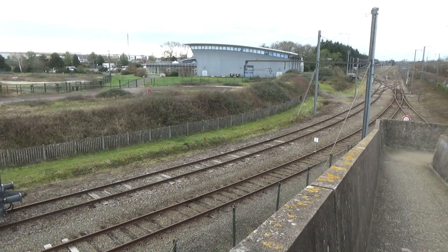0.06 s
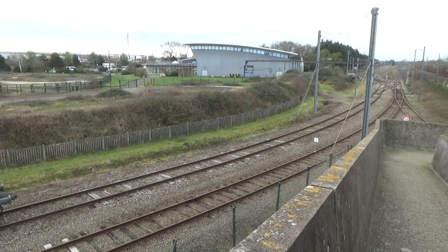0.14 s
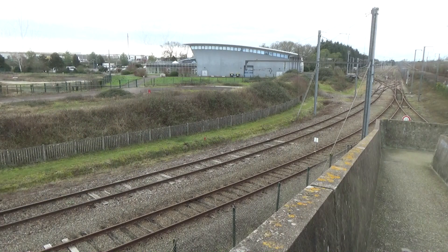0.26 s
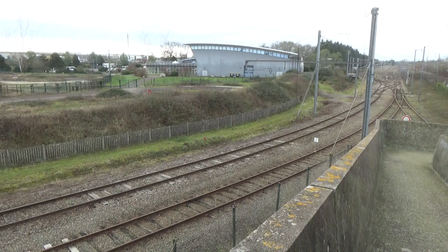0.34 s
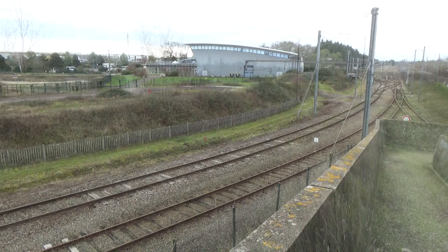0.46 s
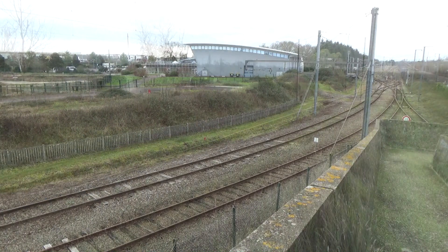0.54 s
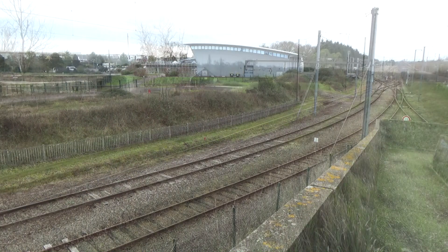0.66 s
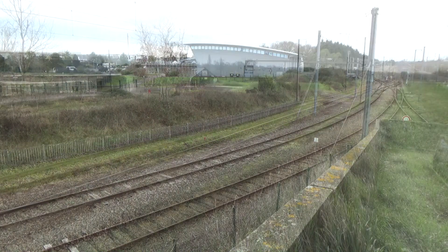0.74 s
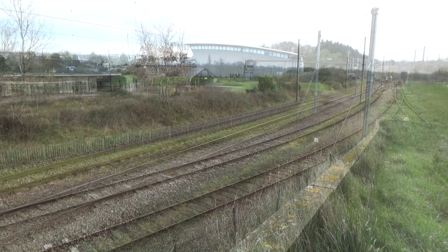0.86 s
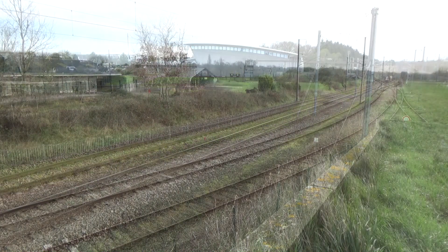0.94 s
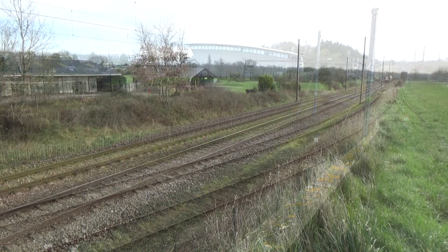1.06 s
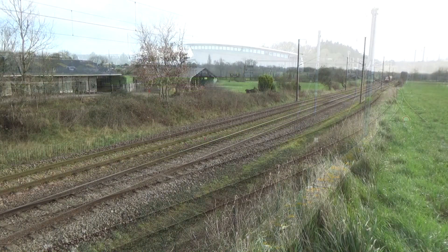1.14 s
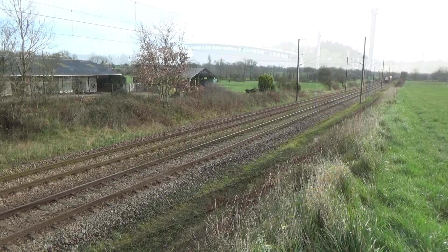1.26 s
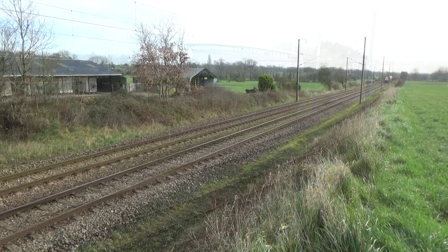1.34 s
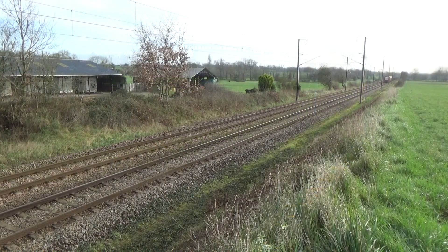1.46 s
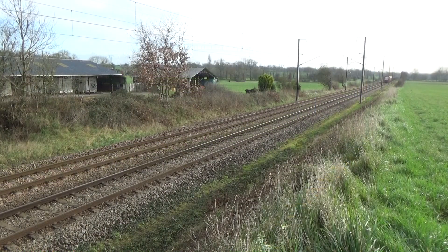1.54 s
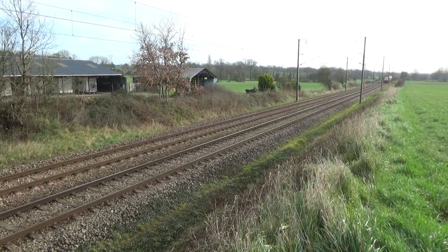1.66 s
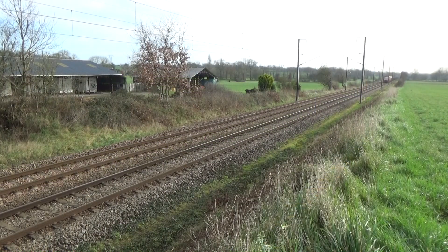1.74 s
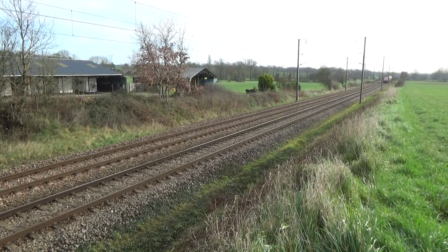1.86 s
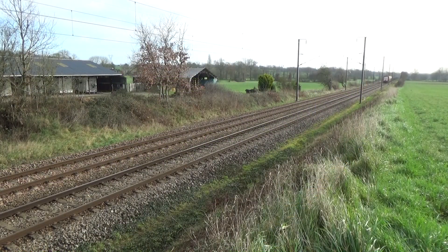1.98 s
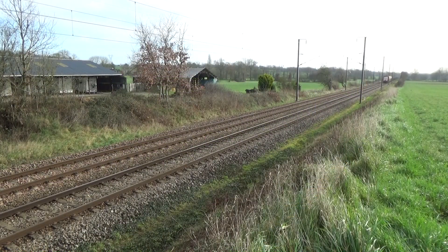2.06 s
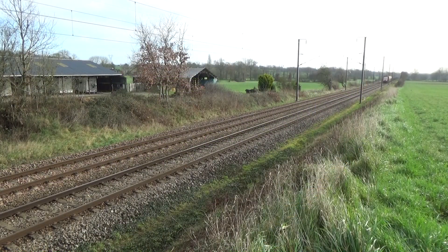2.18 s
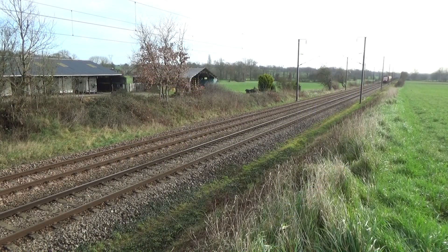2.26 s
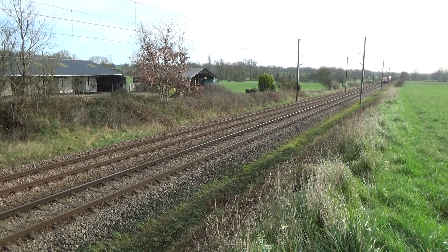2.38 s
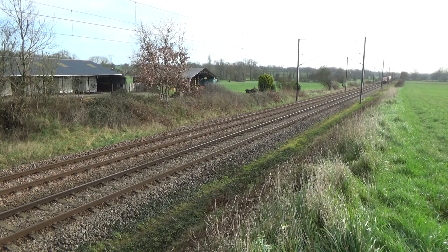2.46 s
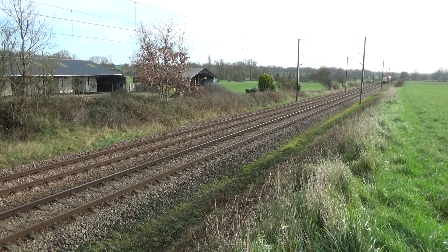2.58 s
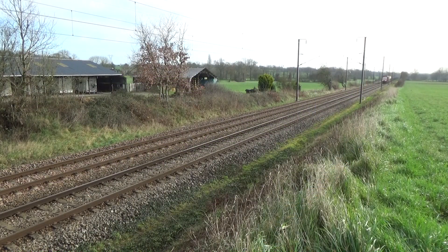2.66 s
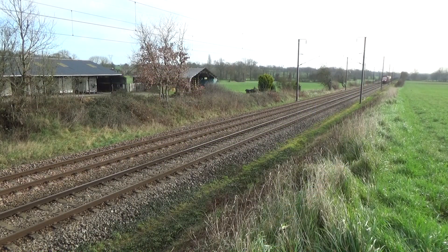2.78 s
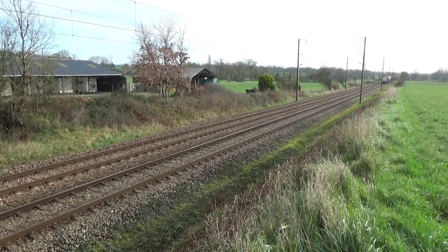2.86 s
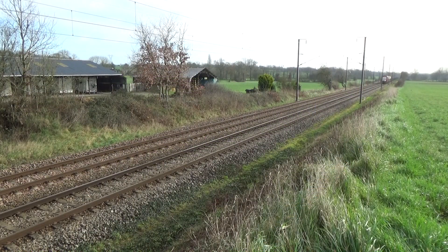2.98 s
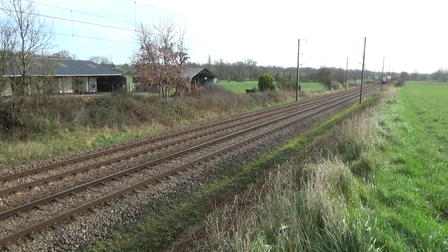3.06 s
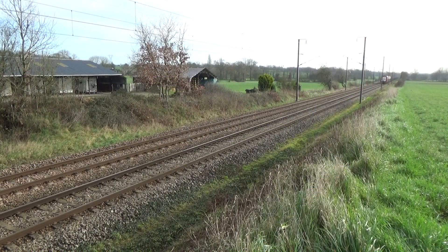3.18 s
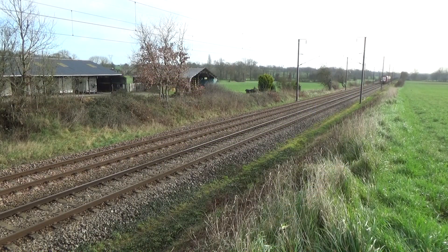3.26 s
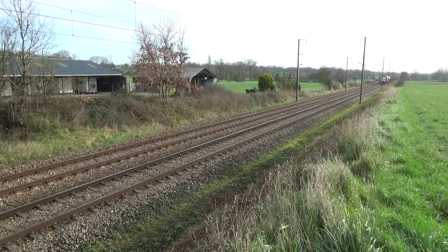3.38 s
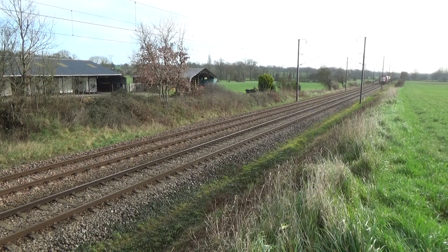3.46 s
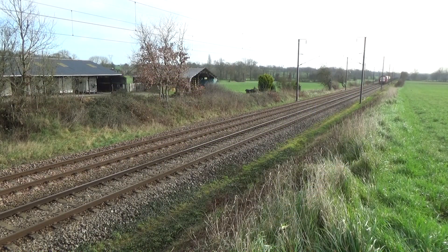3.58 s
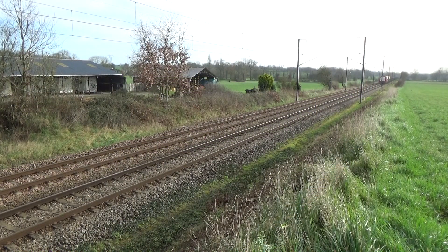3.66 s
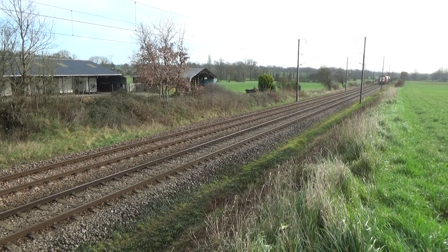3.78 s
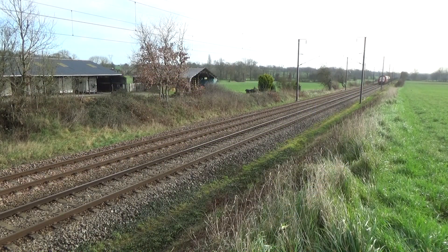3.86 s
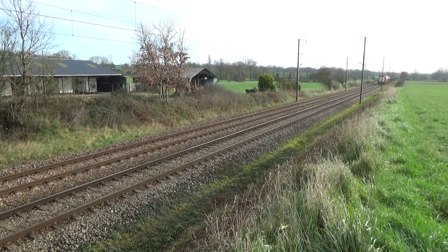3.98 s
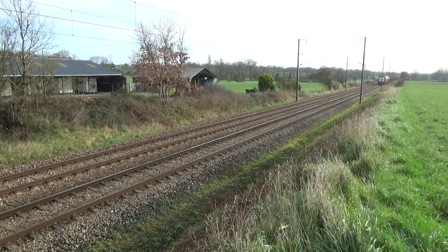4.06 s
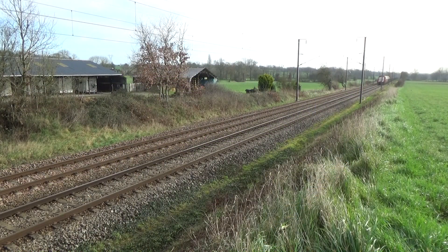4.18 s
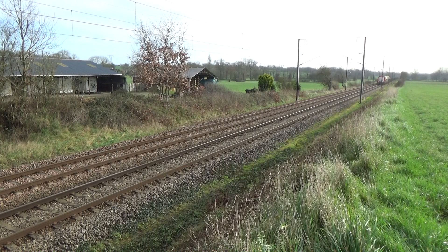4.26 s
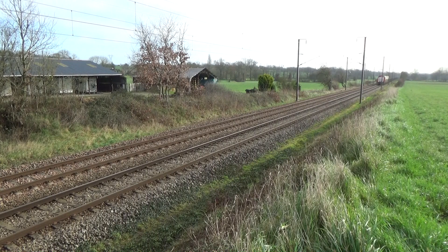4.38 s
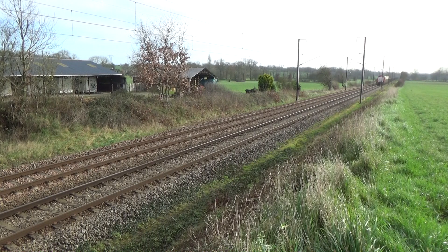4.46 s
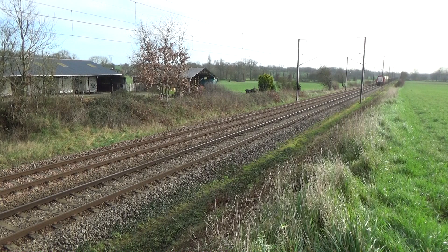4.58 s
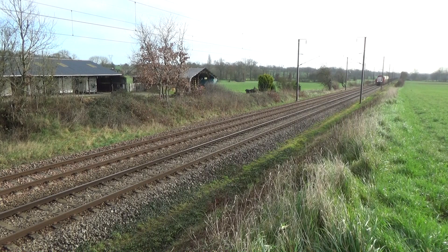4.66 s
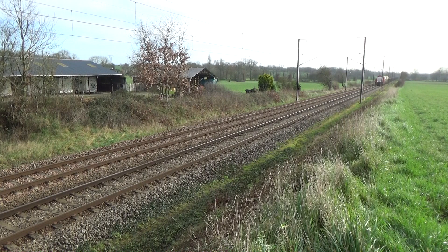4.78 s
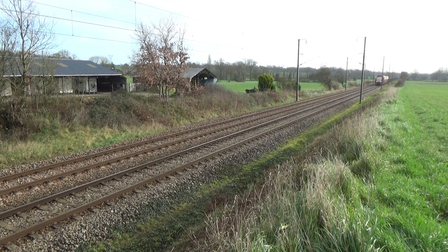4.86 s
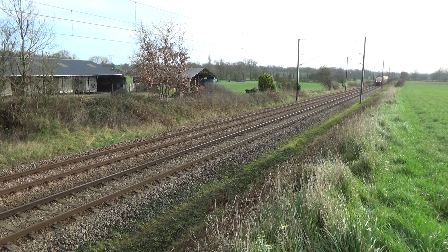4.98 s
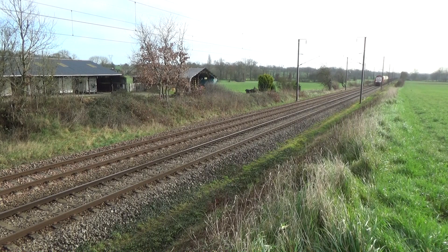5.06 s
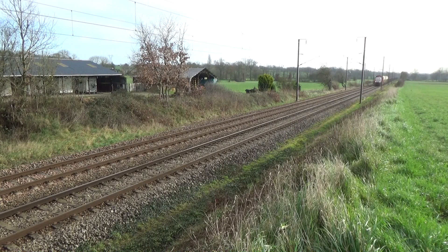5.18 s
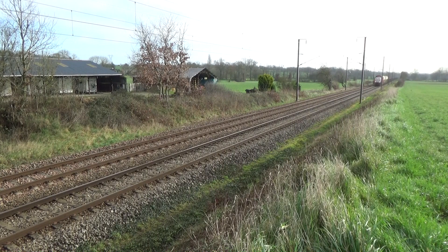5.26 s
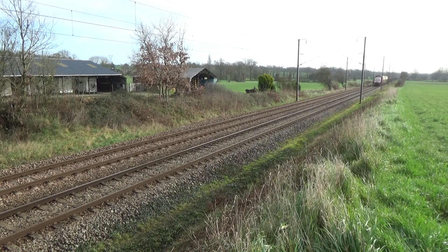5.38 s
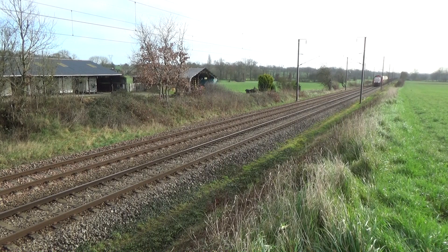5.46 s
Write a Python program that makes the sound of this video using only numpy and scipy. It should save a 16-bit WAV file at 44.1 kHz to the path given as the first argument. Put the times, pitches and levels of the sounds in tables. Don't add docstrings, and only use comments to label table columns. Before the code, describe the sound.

The tail of an electric train roars and sings away to the left, fading into a quiet field with a far rumble slowly growing.

```python
import sys
import numpy as np
from scipy import signal
from scipy.fft import rfft, irfft
from scipy.io import wavfile
from scipy.ndimage import uniform_filter1d

SR = 44100
rng = np.random.default_rng(int(sys.argv[2]) if len(sys.argv) > 2 else 0)


def boost(x):
    u = np.asarray(x, float) / 20
    return 10 ** u


def inscribe(sig):
    pcm = np.round(np.clip(np.atleast_2d(sig).T, -1, 1) * 32767)
    wavfile.write(sys.argv[1], SR, pcm.astype(np.int16))


N = 243873
T = np.arange(N) / SR
HZ = np.fft.rfftfreq(N, 1 / SR)
NEAR_EDGE_HZ = 15120

# (start [s], end [s])
FADE_S = (0.53, 1.835)
# (middle [s], length [s], level [dB])
SHADOWS = [
    (0, 0.0083, -13),
    (.211, 0.041, -4.5),
    (.232, 0.01, -15),
    (.366, 0.1, -7),
    (.683, 0.033, -9),
    (1.0, 0.023, -2),
    (1.07, 0.013, -1),
    (1.162, 0.039, 0),
    (1.625, 0.092, -3.5),
]
# (frequency [Hz], left lead [rad])
FAR_PORTS = [
    [(60, 1.0), (130, 1.0), (290, 0.97), (640, 0.86), (1410, 0.65), (3090, 0.7), (6800, 0.79), (15000, 0.97)],
    [(60, 0.0), (110, 0.0), (200, 0.0), (380, 0.5), (700, 2.5), (1290, 2.5), (2380, -0.5), (4390, -0.5), (8110, 2.5), (15000, 0.0)],
    [(0, 0), (1120, 0.3), (2330, -0.1), (3450, 0.1), (5940, -0.0), (7320, 0.1), (7920, -0.0), (15200, 0.0)],
]


def read(points, hz):
    f, value = np.transpose(points)
    return np.interp(np.log(hz + 1), np.log(f + 1), value)


def curve(rows, t):
    s, *columns = np.transpose(rows)
    return np.array([np.interp(t, s, column) for column in columns])


def bumps(rows, t, order=2):
    return sum(height * np.exp(-abs(2 * (t - s) / length) ** order) for s, length, height in rows)


def resonances(modes):
    power = sum(boost(db) ** 2 / (1 + (2 * (HZ - hz) / width) ** 2) ** 2 for hz, width, db in modes)
    return np.sqrt(power)


def band_db(x, lo, hi):
    z = rfft(x.mean(0))[(HZ > lo) & (HZ < hi)]
    return 10 * np.log10(2 * np.sum(abs(z) ** 2) / N ** 2 + 1e-20)


def ports(gain, same, lean_db, lead):
    a, b, c, d = rng.standard_normal((len(HZ), 4)).T
    share = np.clip(read(same, HZ), 0, 1)
    left = a + 1j * b
    right = share * left + np.sqrt(1 - share ** 2) * (c + 1j * d)
    half = boost(read(lean_db, HZ) / 2) * np.exp(.5j * np.interp(HZ, *np.transpose(lead)))
    x = irfft(gain * np.array([left * half, right / half]), N)
    return x / boost(band_db(x, 0, SR))


def moving(x, levels_db, bands, patchy_db, flicker_db):
    hz, t, z = signal.stft(x, SR, nperseg=512, noverlap=384)
    rows = levels_db(t) - np.array([band_db(x, *band) for band in bands])[:, None]

    middles = np.log([np.sqrt(lo * hi) for lo, hi in bands])
    place = np.interp(np.log(hz + 1), middles, np.arange(len(bands)))
    weights = np.maximum(1 - abs(place[:, None] - np.arange(len(bands))), 0)

    patches = rng.standard_normal((len(t), len(hz)))
    patches = uniform_filter1d(uniform_filter1d(patches, size=30, axis=0), size=10, axis=1).T
    flicker = uniform_filter1d(rng.standard_normal(len(t)), size=5)
    gain_db = weights @ rows
    gain_db += patchy_db * patches / patches.std() * np.clip(hz / 700, 0, 1)[:, None]
    gain_db += flicker_db * flicker / flicker.std() * np.clip(hz / 4000, 0, 1)[:, None]
    return signal.istft(z * boost(gain_db), SR, nperseg=512, noverlap=384)[1][:, :N]


def tone(hz, level_db, waver_hz):
    waver = uniform_filter1d(rng.standard_normal(len(level_db)), size=600)
    pitch_hz = hz + waver_hz * waver / waver.std()
    return np.sqrt(2) * boost(level_db) * np.sin(2 * np.pi * np.cumsum(pitch_hz) / SR)


def rolling_tail():
    # (low [Hz], high [Hz])
    bands = [(60, 240), (270, 900), (2000, 7000), (8000, 13000)]
    # start (level [dB]), loss (rate [dB/s]), dip in the shadows (share)
    start_db = [-20.5, -20.5, -29.5, -44]
    loss_db_per_s = [2.1, 0.28, 0.89, 0.23]
    shade_share = [0, 0.24, 0.54, 0.32]
    # (frequency [Hz], density [dB/Hz])
    roar_spectrum = [(15, -44), (25, -7.5), (133, -0.5), (227, 3), (386, -2.5), (517, -5), (1240, -13),
                     (1900, -19), (3410, -23.5), (3690, -23.5), (4210, -27), (6280, -29.5), (9600, -40),
                     (13200, -47), (14300, -58)]
    # (frequency [Hz], width [Hz], level [dB])
    body_modes = [(190, 24, -2), (225, 12, -3), (255, 12, -4), (305, 12, -7), (350, 7, -2), (503, 10, -10),
                  (894, 14, -12)]
    wheel_modes = [(1579, 20, -5), (1797, 11, -3), (1863, 20, -7), (2208, 16, -5), (2707, 25, -10),
                   (3019, 20, -11), (3159, 35, -8), (3293, 16, -9), (3363, 16, -9), (4417, 32, -10),
                   (4768, 27, -11), (5120, 40, -14), (5561, 25, -14), (7780, 30, -19), (8834, 40, -21),
                   (9297, 70, -18)]
    # (frequency [Hz], left lead [rad])
    image = [
        [(60, .46), (130, .5), (290, .63), (640, .6), (1410, .64), (3090, .8), (6800, .6), (15000, .9)],
        [(60, -0.5), (92, 0.0), (140, 0.5), (210, 1.5), (330, 2.5), (500, 4.0), (770, 6.5), (1170, 5.5), (1790, 6.0), (2740, 6.5), (4190, 8.0), (6400, 5.5), (9790, -0.5), (15000, 0.0)],
        [(0, 0), (780, -0.1), (1030, -0.6), (1460, -0.3), (1810, -0.7), (3270, -0.1), (4050, -0.8), (4650, -0.5), (5250, -0.9), (5770, -0.6), (7060, -0.3), (9130, 0.6), (10700, 0.0), (15200, 0.0)],
    ]
    lean_db_per_s, lean_until_s = 2, 2

    def levels_db(t):
        shade_db = np.outer(shade_share, bumps(SHADOWS, t, order=4))
        return np.c_[start_db] - np.outer(loss_db_per_s, t) + shade_db

    roar = ports(boost(read(roar_spectrum, HZ)) * (HZ < NEAR_EDGE_HZ), *image)
    roar += boost(-7) * ports(resonances(body_modes), *image)
    roar += boost(-23) * ports(resonances(wheel_modes), *image)
    rolling = moving(roar, levels_db, bands, patchy_db=-0.1, flicker_db=1.0)
    lean_db = lean_db_per_s * (np.minimum(T, lean_until_s) - FADE_S[0])
    return rolling * boost(np.outer([.5, -.5], lean_db))


def singing_wheels():
    # (frequency [Hz]), start (level [dB]), loss (rate [dB/s])
    pitches_hz = (3716, 4069, 7431, 4417, 4770)
    start_db = [-42, -46.5, -52.5, -61, -59.5]
    losses_db_per_s = [1.5, 6, 3, 0, 1]
    # (middle [s], length [s], level [dB])
    low_rubs = [(.03, .04, 4), (.16, .1, 6), (.31, .12, 4), (.52, .25, 4), (.72, .1, 6), (.89, .09, 4),
                (1.036, .06, 8), (1.115, .05, 5), (1.21, .06, 3), (1.38, .14, 5)]
    high_rubs = [(.02, .08, 5), (.12, .1, 8), (.184, .04, 5), (.315, .09, 8), (.44, .14, 7), (.8, .09, 7),
                 (1.175, .08, 9), (1.29, .07, 4), (1.45, .12, 5), (1.56, .06, 5)]
    shade_db = 1.2 * bumps(SHADOWS, T, order=4)
    low_db, high_db = bumps(low_rubs, T), bumps(high_rubs, T)
    rubs = (low_db, high_db, high_db, low_db / 2, low_db / 2)
    singing = sum(tone(hz, db - loss * T + shade_db + rub_db, waver_hz=11.8)
                  for hz, db, loss, rub_db in zip(pitches_hz, start_db, losses_db_per_s, rubs))
    return singing * boost(np.array([[2.5], [-4.5]]))


def body_tones():
    # (middle [s], length [s], frequency [Hz], level [dB])
    panel_booms = [
        (0.094, 0.19, 350, -27),
        (0.38, 0.074, 263.3, -21),
        (0.606, 0.12, 349, -23),
        (0.654, 0.11, 244.7, -22.5),
        (0.799, .2, 301.7, -25),
        (1.014, 0.1, 246.4, -29),
        (1.205, .25, 307.3, -27),
        (1.406, 0.38, 354.6, -26.5),
    ]
    # (time [s], frequency [Hz], level [dB])
    motor = [(0, 214.8, -23), (.15, 224.6, -25), (.3, 227, -20.5), (.4, 193.5, -27.5), (.5, 186.5, -34),
             (.62, 186.6, -34), (.72, 192.7, -24), (.9, 218, -21.5), (1.05, 214.3, -27)]
    panels = sum(bumps([(s, length, 1)], T) * tone(hz, db + 0 * T, waver_hz=3.96)
                 for s, length, hz, db in panel_booms)
    return panels + tone(*curve(motor, T), waver_hz=3.3)


def body_hum():
    lean_db, side_db = 1.0, -13
    centre = body_tones() * boost(np.c_[[lean_db, -lean_db]])
    return centre + np.outer([1, -1], boost(side_db) * body_tones())


def converter_whine():
    # (frequency [Hz], width [Hz], level [dB])
    whine_modes = [(14755, 110, 0), (14700, 500, -12)]
    # (middle [s], length [s], level [dB])
    surges = [
        (0, .2, 12),
        (.165, 0.035, 4),
        (.245, .04, 10),
        (.305, .04, 9),
        (.76, .06, 5),
        (.93, 0.081, 5),
        (1.8, .25, -20),
    ]
    level_db = -55 - 1 * T + 0.77 * bumps(SHADOWS, T, order=4) + bumps(surges, T)
    return ports(resonances(whine_modes), *FAR_PORTS) * boost(level_db)


def near_train():
    return rolling_tail() + singing_wheels() + body_hum() + converter_whine()


def nearing_db(t):
    arrive_s = 8.72
    return -20 * np.log10(1 - t / arrive_s)


def far_rolling():
    # (low [Hz], high [Hz])
    bands = [(30, 250), (450, 1800), (2500, 4000), (4100, 5400), (5900, 7900)]
    # locomotive (level [dB]), pull of nearness (share), distant traffic (level [dB])
    loco_db = [-52.5, -50, -67.5, -73, -71.5]
    nearing_share = [1.1, 1.15, 1.4, 1.75, 1.8]
    traffic_db = [-46.5, -43, -58, -68.5, -73]
    # (frequency [Hz], density [dB/Hz])
    roar_spectrum = [(13, -38), (22, -2), (49, 7.5), (101, 3), (130, -1), (162, -5), (379, -11.5),
                     (440, -12.5), (594, -13.5), (673, -14.5), (932, -12.5), (2350, -27.5), (5630, -42),
                     (6530, -34), (8600, -56), (11200, -74), (18900, -120)]
    # (frequency [Hz], width [Hz], level [dB])
    ground_modes = [(50, 8, 0), (82, 8, 0), (148, 16, -2)]
    rail_modes = [(4225, 14, -6), (4600, 300, -14), (6320, 12, -7), (6620, 60, -6), (6948, 50, -5),
                  (7288, 30, -2), (7550, 600, -16), (7757, 40, -10), (9200, 900, -27), (10850, 200, -26)]
    # (middle [s], length [s], level [dB])
    gusts = [
        (3.92, 0.28, 1.5),
        (4.4, 0.2, 2),
        (4.75, 0.16, 2),
        (5.3, 0.22, 1.5),
    ]

    def levels_db(t):
        train_db = np.c_[loco_db] + np.outer(nearing_share, nearing_db(t))
        field_db = np.c_[traffic_db] - 1.72 * (t - FADE_S[1])
        both_db = 10 * np.log10(boost(2 * train_db) + boost(2 * field_db))
        return both_db + np.outer([0, 1, 0, 0, 0], bumps(gusts, t))

    roar = ports(boost(read(roar_spectrum, HZ)), *FAR_PORTS)
    roar += boost(-12.5) * ports(resonances(ground_modes), *FAR_PORTS)
    roar += boost(-32.5) * ports(resonances(rail_modes), *FAR_PORTS)
    return moving(roar, levels_db, bands, patchy_db=1.05, flicker_db=.4)


def overhead_wire():
    # (middle [s], length [s], level [dB])
    gaps = [
        (2.24, .6, -12),
        (2.86, 0.088, -5),
        (3.58, 0.12, -8),
    ]
    return tone(6428, -81 + 1.8 * nearing_db(T) + bumps(gaps, T, order=4), waver_hz=2.8)


def far_motor():
    # (middle [s], length [s], level [dB])
    beats = [(2.01, .08, -12), (3.02, 0.049, -1), (3.45, .07, -18), (3.6, 0.091, 2.5), (4.2, 0.048, -9),
             (4.285, 0.074, 5.5), (4.42, 0.093, -10), (4.54, 0.18, 3.5), (5.22, .1, 3), (5.3, .05, -9),
             (5.43, 0.083, 5.5)]
    return tone(131.2, -52 + .9 * nearing_db(T) + bumps(beats, T), waver_hz=1.6)


def far_train():
    return far_rolling() + overhead_wire() + far_motor()


def hiss():
    # (frequency [Hz], density [dB/Hz])
    spectrum = [(4820, -27), (8200, -0.5), (10100, 0.5), (11500, -1.5), (15400, -4.5)]
    x = ports(boost(read(spectrum, HZ)), *FAR_PORTS)
    return x * boost(-68.5 - band_db(x, 8500, 15000))


def birds():
    # (start [s], length [s], first [Hz], last [Hz], level [dB])
    plain_notes = [
        (1.72, .14, 4420, 4420, -66),
        (1.94, .1, 4420, 4330, -70),
        (2.39, .13, 5450, 5460, -70),
        (3.6, .035, 4450, 4350, -63),
        (3.71, .07, 5350, 5200, -66),
    ]
    # (time [s], frequency [Hz], level [dB])
    chirp = [
        (2.098, 4380, -63),
        (2.107, 4420, -63),
        (2.113, 4630, -59),
        (2.135, 4620, -64),
        (2.15, 4610, -59),
        (2.183, 4560, -60),
        (2.207, 4250, -63),
        (2.243, 3420, -59),
        (2.265, 3080, -65),
    ]
    out = np.zeros(N)
    plain = [[(s, first_hz, db), (s + length, last_hz, db)] for s, length, first_hz, last_hz, db in plain_notes]
    for rows, ends in zip([chirp] + plain, [.15] + [.6] * len(plain)):
        on = (T > rows[0][0]) & (T < rows[-1][0])
        hz, level_db = curve(rows, T[on])
        out[on] += signal.windows.tukey(on.sum(), ends) * tone(hz, level_db, waver_hz=25)
    echo = rng.standard_normal((2, 4000)) * boost(-54 - 60 * T[:4000] / 0.23)
    return out * boost(np.array([[1.5], [-1.5]])) + signal.oaconvolve(out[None], echo, axes=1)[:, :N]


def ticks():
    # (time [s], peak [dB], ringing share [dB], low modes [dB])
    snaps = [
        (1.936, -59, -20, 0),
        (3.093, -53, 13, 7),
        (3.1055, -56, 12, -3),
        (3.489, -55, -20, 0),
        (3.586, -56, -20, 0),
        (3.756, -61, 11, -12),
        (3.963, -53, -6, -6),
        (4.696, -52, -20, 0),
        (4.787, -53, -20, 0),
        (5.044, -49, -12, -6),
    ]
    # (frequency [Hz], width [Hz], level [dB])
    modes = [(5800, 260, 0), (6900, 260, -3), (9260, 220, 0), (10700, 300, -9), (13000, 300, -11)]
    out, t = np.zeros(N), T[:400]
    bright = signal.butter(2, (6500, 14000), "bandpass", fs=SR)
    onset = 1 - np.exp(-t / .001)
    for s, peak_db, ring_db, low_db in snaps:
        snap = signal.lfilter(*bright, rng.standard_normal(len(t))) * np.exp(-t / .002)
        rings = np.zeros(len(t))
        for hz, width, db in modes:
            ring = np.exp(-np.pi * width * t) * np.sin(2 * np.pi * (hz * t + rng.random()))
            rings += boost(db + low_db * (hz < 8000)) * ring
        out[round(s * SR):][:400] += boost(peak_db) * (2 * snap + boost(ring_db) * rings) * onset
    return out * boost(np.array([[1.5], [-1.5]]))


def faded(t):
    return np.clip((t - FADE_S[0]) / (FADE_S[1] - FADE_S[0]), 0, 1)


def scene():
    near_gain = (1 - faded(T)) ** .8
    return near_gain * near_train() + faded(T) * (far_train() + hiss() + birds() + ticks())


def starved(x):
    # (middle [s], length [s], share [0-1])
    dropouts = [
        (.05, .62, .6),
        (.74, .05, .8),
        (.95, .2, .12),
        (1.23, .04, .3),
        (1.51, .04, .8),
    ]
    # (low [Hz], high [Hz])
    range_hz = (11300, 14400)
    hz, t, z = signal.stft(x, SR, nperseg=1024, noverlap=768)
    block, band = np.arange(len(t)) // 7, np.arange(len(hz)) // 8
    draws = rng.random((block[-1] + 1, band[-1] + 1))[block][:, band].T
    height = np.clip((hz - range_hz[0]) / (range_hz[1] - range_hz[0]), 0, 1) * (hz < range_hz[1])
    holes = draws < np.sqrt(height)[:, None] * bumps(dropouts, t, order=4)
    top = (hz[:, None] > NEAR_EDGE_HZ) & (t < 1.6)
    return signal.istft(z * ~(holes | top), SR, nperseg=1024, noverlap=768)[1][:, :N]


def low_pass(x):
    return signal.sosfilt(signal.butter(12, 15730, fs=SR, output="sos"), x)


def record(dry):
    mix = starved(dry)
    return low_pass(mix)


dry = scene()
out = record(dry)
inscribe(out)
```